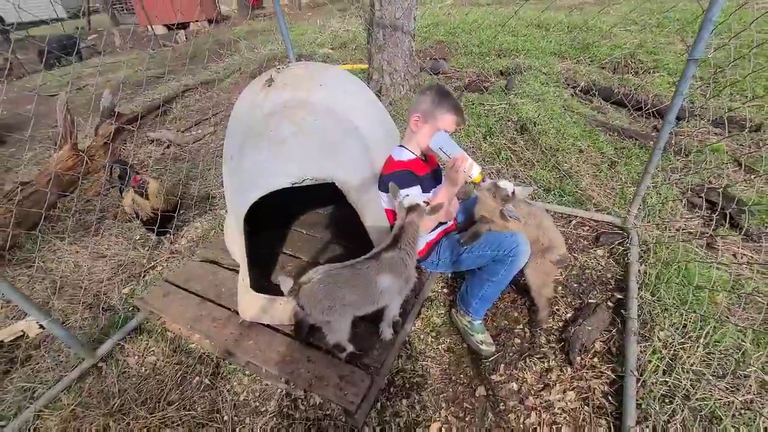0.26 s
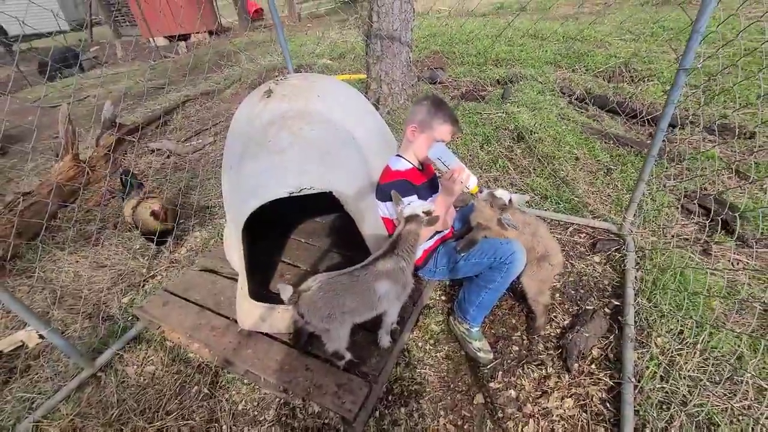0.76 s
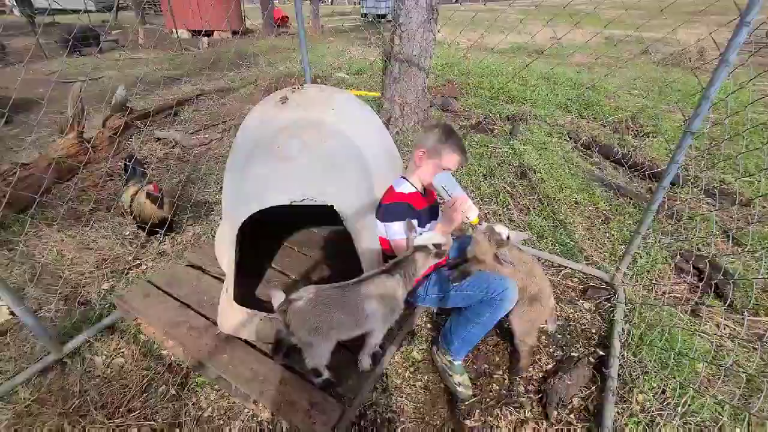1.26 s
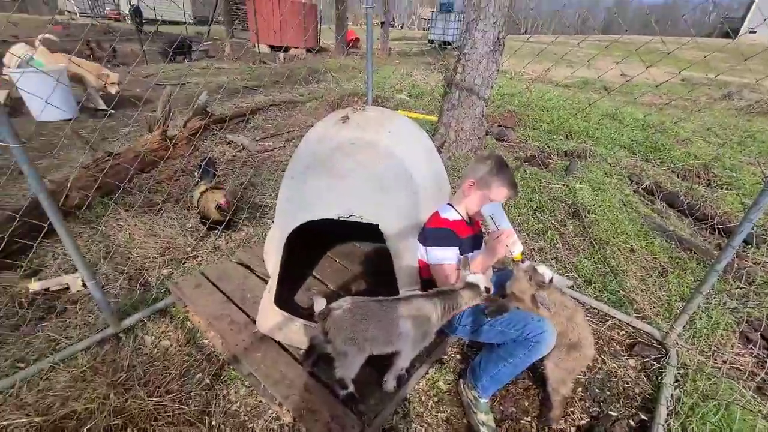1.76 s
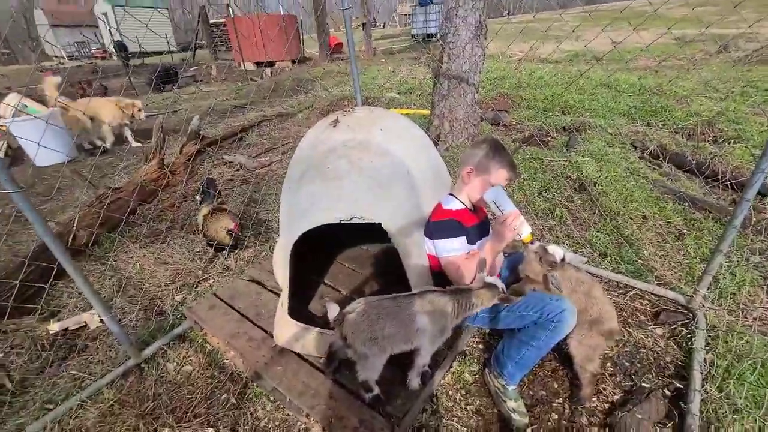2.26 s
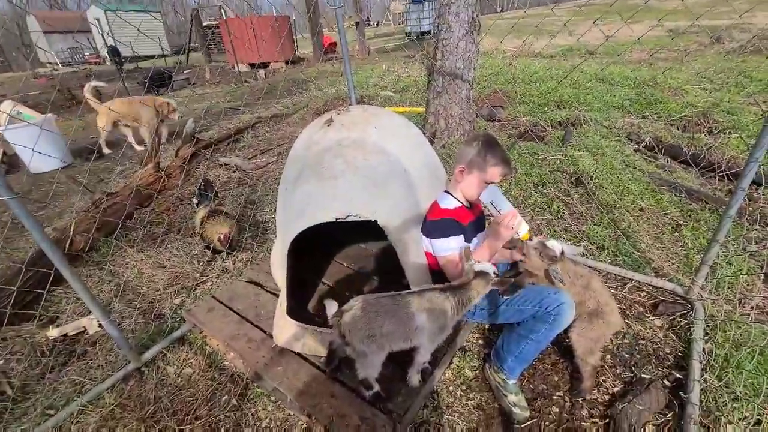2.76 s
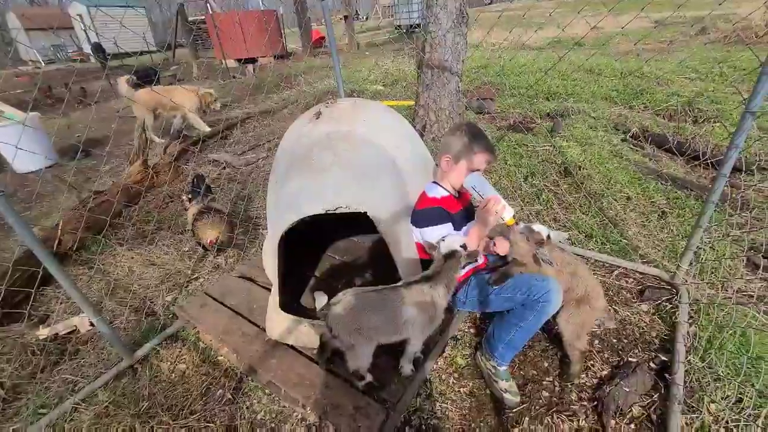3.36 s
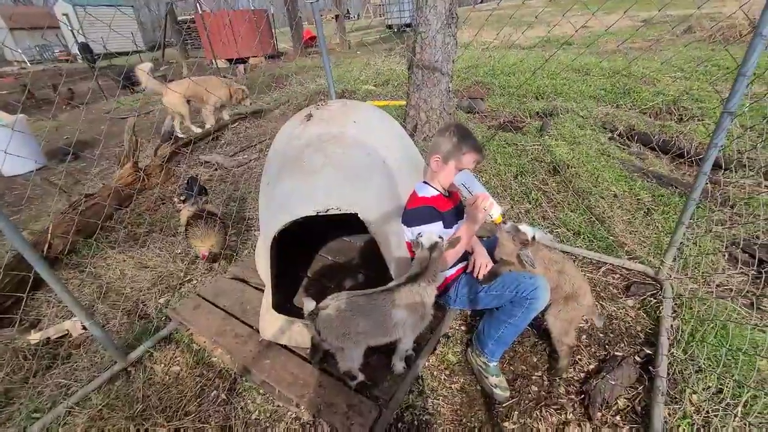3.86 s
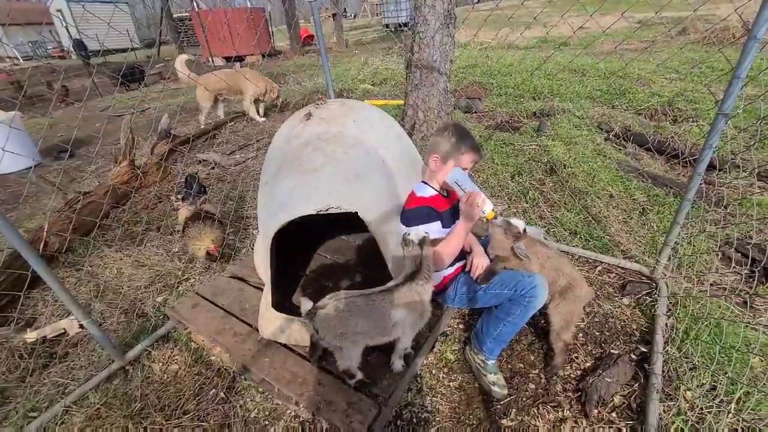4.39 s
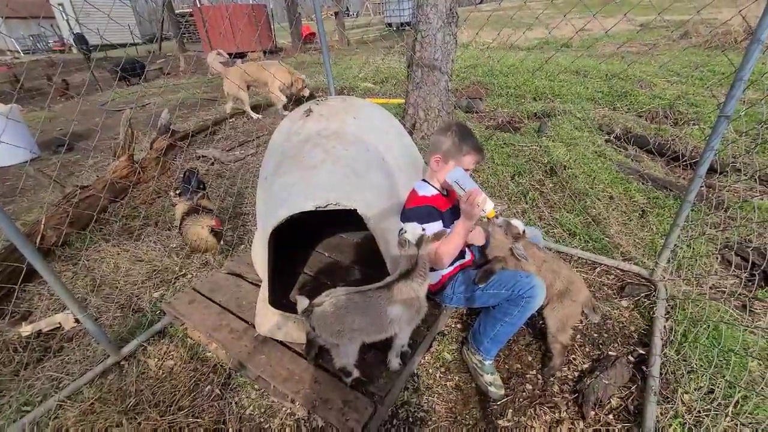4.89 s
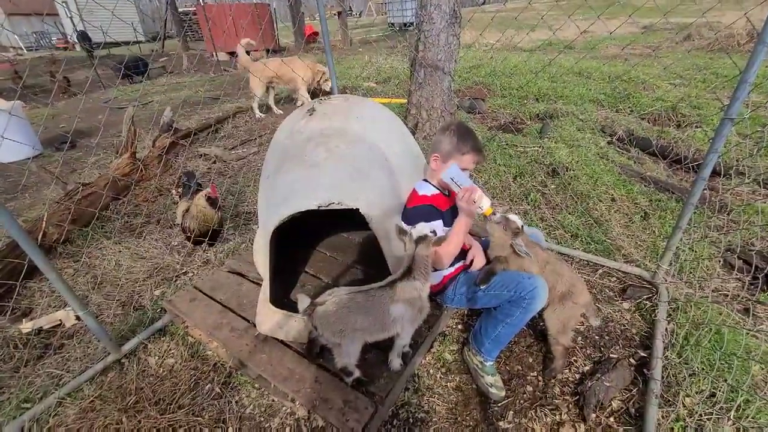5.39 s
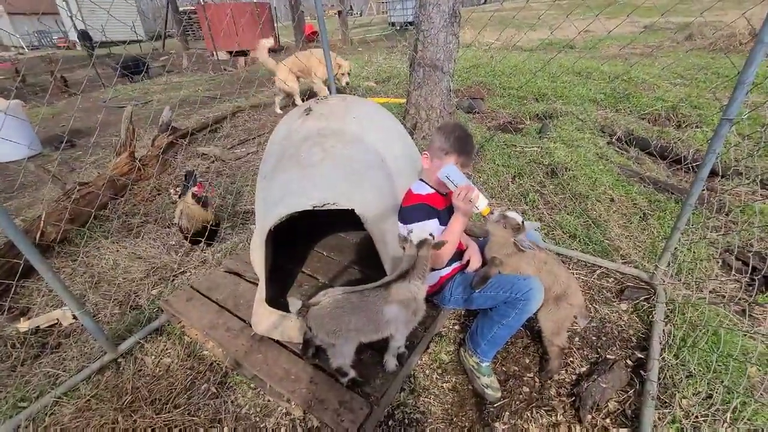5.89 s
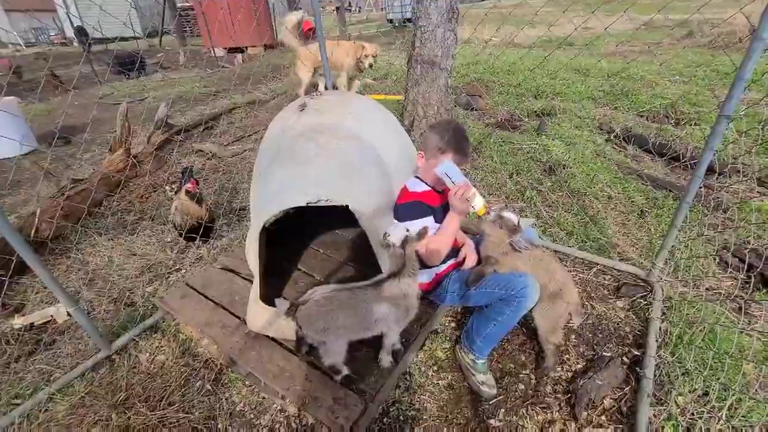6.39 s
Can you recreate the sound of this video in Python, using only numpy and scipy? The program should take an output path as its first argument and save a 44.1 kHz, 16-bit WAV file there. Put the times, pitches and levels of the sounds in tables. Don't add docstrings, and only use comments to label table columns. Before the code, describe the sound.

In an open farm pen, soft wind rumble and straw rustle lie under sharp hollow hoof knocks. A small goat kid bleats in thin breathy puffs, then a second gives a loud, fast-fluttering bleat. A bottle is sucked wetly with small grunts. Later come hard knocks, a rattling latch, ringing posts and a run of wire ticks, then a hen's short clucks. Close, nearly dry sound.

```python
import sys
import numpy as np
from scipy import signal
from scipy.fft import rfft, irfft
from scipy.io import wavfile
from scipy.ndimage import uniform_filter1d

SR = 44100
rng = np.random.default_rng(int(sys.argv[2]) if len(sys.argv) > 2 else 0)


def pcm_store(signal):
    levels = np.round(np.clip(np.atleast_2d(signal), -1, 1) * 32767)
    wavfile.write(sys.argv[1], SR, levels.astype(np.int16).T)


def decibels_to_gain(level_db):
    exponent = np.asarray(level_db, float) / 20
    return 10 ** exponent


N = 292824
T = np.arange(N) / SR

# pitch_hz, density_db
YARD_COLOUR = [(12, -41), (20, -6), (91, 0.5), (189, -11.5), (479, -15), (709, -12), (939, -17.5),
               (1240, -14.5), (2180, -21), (3140, -16), (5360, -28), (6910, -20.5), (8650, -39.5),
               (10500, -38), (12200, -32.5), (13500, -46), (15200, -36), (16500, -108)]
# time_s, rustle_db
STRAW_STIR = [(0.0, -60.5), (0.74, -63.5), (0.87, -60), (1.2, -64.5), (1.9, -57.5), (2.33, -53),
              (2.79, -56), (2.981, -63), (3.25, -55.5), (3.79, -58.5), (4.25, -53.5), (4.57, -56),
              (5.16, -61), (5.31, -55.5), (5.81, -57.5), (6.64, -56)]

# start_s, peak_db,
# tilt_db_per_octave (taut wire adds fade_60db_s)
MESH_TICKS = [(0.373, -42, -10.5), (1.306, -49.5, -1), (2.2173, -40, -8), (2.821, -35.5, -9),
              (2.9322, -39.5, -4), (3.022, -35.5, -7), (3.126, -29, -2.5), (3.302, -46, -4),
              (3.619, -50.5, 1), (3.698, -42, -10), (3.8718, -38.5, -3), (4.0635, -26, -5),
              (4.1105, -32.5, -3), (4.158, -58, 2), (4.416, -37, -1), (4.332, -24, -1.5), (4.426, -25, 0),
              (4.5216, -23, 1.5), (4.622, -29, -0.5), (4.7047, -26.5, 1.5), (4.795, -36, -0.5),
              (5.029, -40.5, 5), (5.129, -46, 8), (5.323, -33.5, -5), (5.1937, -24.5, 3),
              (5.4126, -29, 1.5), (5.6912, -31.5, 0.5), (5.789, -38, -2.5), (5.994, -41.5, -1.5),
              (6.059, -43, 8), (6.125, -32.5, 0), (6.3003, -37.5, -1.5), (6.37, -29.5, 1),
              (6.561, -37, -5.5)]
TAUT_TICKS = [
    (1.438, -33, 4, 0.0053),
    (1.4528, -33, -8, 0.0072),
    (1.818, -26, -8.5, 0.005),
    (3.742, -39.5, 10, 0.023),
    (3.807, -33, -2.5, 0.12),
    (6.031, -34, -4.5, 0.062),
    (6.1826, -30.5, -2, 0.15),
]
# pitch_hz, gain_db
TICK_COLOUR = [(710, -82), (1200, -14.5), (2030, -6), (2420, -5.5), (3180, 1), (4100, 3.5), (4280, 1),
               (6860, 1.5), (8180, -10.5), (9230, -4.5), (14800, -15.5), (16000, -29), (16500, -55)]

# start_s, length_s, level_db, tilt_db_per_octave
WET_SUCKS = [(0.316, 0.011, -48, -1.5), (0.503, 0.023, -51, -2.5), (0.693, 0.012, -52.5, 5),
             (0.867, 0.026, -48, 1.5), (1.242, 0.028, -51.5, -1.5), (1.608, 0.082, -56.5, 4.5),
             (1.75, 0.12, -61, 6), (1.942, 0.07, -57, 5), (2.161, 0.06, -51, -1.5),
             (2.011, 0.02, -43, -4.5), (3.343, 0.022, -52, 2.5), (3.534, 0.019, -50, -2),
             (3.713, 0.022, -46.5, -6.5), (3.897, 0.039, -50.5, -3.5), (4.205, 0.056, -40.5, 6.5),
             (4.798, 0.044, -50, 0.5), (4.292, 0.021, -39, 0.5), (4.483, 0.015, -40, 0.5),
             (4.842, 0.047, -53.5, 1)]
DRY_SUCKS = [(2.351, .008, -62, 12), (2.38, 0.017, -60, 8), (2.53, .02, -58, 10), (5.052, 0.029, -48.5, 0),
             (5.221, 0.054, -44, -3), (5.326, 0.025, -50, -4), (5.441, 0.041, -45.5, 0.5),
             (5.633, 0.027, -45, -1), (5.835, 0.027, -47.5, -5), (6.031, 0.022, -49, 4.5),
             (6.223, 0.034, -46, 1.5), (6.412, 0.022, -48, 0), (6.541, 0.014, -46, -7),
             (6.618, 0.016, -46, 5)]
# pitch_hz, gain_db
SUCK_COLOUR = [(1060, -35.5), (1800, 4.5), (2270, -17.5), (2760, 9.5), (3640, 0.5), (3990, 10.5),
               (5320, -7.5), (6590, 7.5), (8080, -6.5), (13800, -7.5), (15200, -16), (15900, -30),
               (16500, -70)]
# start_s, length_s, level_db, hollow_hz
GRUNTS = [
    (0.685, 0.037, -48, 547),
    (1.916, 0.029, -41, 630),
    (2.303, 0.03, -43, 594),
    (2.671, 0.025, -47, 393),
    (4.933, 0.031, -44.5, 640),
    (5.362, 0.021, -38, 565),
    (5.489, .022, -53, 646),
    (5.551, 0.04, -40.5, 560),
]
# pitch_hz, gain_db
GRUNT_COLOUR = [(150, -4), (250, -14.5), (625, -8.5), (949, -9.5), (1180, -3), (1330, -25), (1460, 0),
                (1620, -11), (2350, 0.5), (4000, -66), (5200, -58), (8800, -120)]

# start_s, peak_db, hollow_hz, fade_60db_s
KNOCKS = [(0.7547, -22.5, 1410, 0.37), (0.7771, -13.5, 1240, 0.13), (0.7784, -12.5, 2130, 0.055),
          (0.984, -37, 690, 0.085), (1.053, -39.5, 1100, 0.32), (2.367, -22, 2450, 0.17),
          (2.393, -19, 1130, 0.076), (2.404, -20, 1190, 0.25), (2.989, -23.5, 1120, 0.17),
          (3.199, -8.5, 2830, 0.092), (3.4082, -20.5, 1250, 0.18), (3.834, -24, 720, 0.03),
          (3.856, -51, 2620, 0.13), (4.063, -25.5, 740, 0.17), (4.1427, -21, 820, 0.18),
          (4.1979, -9, 2730, 0.12), (4.219, -26, 590, 0.53), (4.432, -30, 1210, 0.28),
          (4.798, -33, 3200, 0.74), (5.193, -22, 610, 0.21)]
# pitch_hz, gain_db
KNOCK_COLOUR = [(150, -61), (250, -18.5), (460, -8), (566, -5), (938, -1.5), (1420, 3), (1550, -4),
                (1880, -0.5), (2200, -12), (3120, -5), (4190, -9.5), (9660, -21), (16000, -43)]
# pitch_ratio, level_db, fade_60db_s
POST_MODES = [(1, -2, 0.63), (1.022, -13, 1), (0.978, -15, 0.92), (1.056, -5.5, 0.48), (1.289, -20, 0.48),
              (1.601, -13.5, 0.38)]
# start_s, level_db
THIN_POST_RINGS = [
    (.785, -40.5),
    (2.931, -53.5),
    (3.029, -54),
    (3.126, -47.5),
]
THICK_POST_RINGS = [(3.205, -42.5), (3.411, -54.5), (4.202, -32.5), (4.332, -48), (4.43, -48),
                    (4.522, -47.5), (4.621, -52), (4.705, -46.5), (4.799, -46.5), (5.189, -38),
                    (5.411, -53.5), (5.693, -62), (6.199, -53), (6.37, -48)]
# start_s, peak_db
LATCH_RATTLE = [(0.7495, -33), (3.2015, -16), (3.2036, -19), (3.211, -30), (3.8557, -24), (4.008, -56),
                (4.029, -39), (4.046, -35), (4.085, -34), (4.091, -25), (4.112, -28), (4.1303, -28),
                (4.146, -27), (4.165, -22.5), (4.1817, -25)]
# start_s, peak_db, pitch_hz
THUMPS = [
    (2.999, -38, 55),
    (3.14, -31, 64.5),
    (4.065, -39, 240),
    (4.088, -41.5, 200),
    (4.11, -38, 260),
    (4.143, -35, 180),
    (4.196, -34, 200),
    (5.442, -39.5, 56),
]

# time_s, pitch_hz, level_db
FAR_MOAN = [
    (1.461, 212, -68.5),
    (2.0, 221, -61),
    (2.15, 214, -71),
]
# start_s, length_s, start_hz, top_hz, level_db
LOUD_OPEN = [
    (2.058, 0.035, 278.5, 301.5, -46),
    (2.158, 0.029, 340.8, 380.3, -41.5),
    (2.243, 0.037, 369, 408.4, -35.5),
    (2.33, 0.043, 399, 426.5, -24),
    (2.422, 0.047, 386.7, 424.5, -23.5),
    (2.514, .05, 374.6, 417, -22),
    (2.61, 0.046, 384, 407.6, -22),
    (2.706, 0.035, 365, 365.3, -24.5),
]
THIN_OPEN = [
    (1.552, 0.028, 651, 739, -50.5),
    (1.645, 0.04, 792, 750, -35.5),
    (1.758, 0.041, 756, 743, -40),
    (1.868, 0.052, 750, 743, -46.5),
    (1.985, 0.052, 764, 758, -47),
    (2.103, 0.048, 753, 778, -47),
]
HEN_OPEN = [
    (5.144, .036, 450.6, 443, -30),
]
CLUCK_OPEN = [
    (5.346, .026, 260, 396, -39.5),
]
# open_hz, pinched_hz, half_width_hz, open_db, pinched_db
LOUD_THROAT = [(884, 836, 97, -1.5, -6.5), (1650, 1200, 125, -14, -50), (2305, 2410, 130, 0.5, 3),
               (2850, 3020, 390, -6, -4), (3245, 3340, 280, -1, 7), (3950, 4300, 112, -2.5, 4.5),
               (4560, 4620, 180, -6, 9.5), (6000, 5710, 350, -12.5, 4), (7540, 7170, 320, -34, -15),
               (9570, 8500, 680, -43, -30.5), (12400, 11000, 900, -44, -41)]
THIN_THROAT = [(750, 370, 660, 0, -10), (1570, 1700, 430, -2, -15), (2280, 2900, 540, 1.5, -5),
               (3200, 3000, 440, -2.5, -2), (3850, 4000, 660, -3.5, -11), (6260, 7200, 510, 1, 5),
               (7060, 7800, 410, 6.5, 6), (10200, 12000, 2400, -31, -29)]
HEN_THROAT = [(447, 680, 320, -2.5, -0.5), (900, 690, 284, 1, 1.5), (1800, 1560, 160, 1, -8),
              (2330, 2400, 620, -9, -25), (3200, 2800, 310, -11, -16), (4860, 4800, 380, -5.5, -20),
              (10900, 8400, 1600, -40, -36.5)]
# time_s, resonance_stretch, treble_db, pinched_hz, early_push_db, tongue_swing_share, middle_db
LOUD_JAW = [(2.05, 0.9, -1, 275.4, 4, -0.14, 8), (2.212, 1.04, 1, 319.2, -2, 0.054, 7),
            (2.299, 1.023, 5.5, 429.6, -8.5, 0.13, 14.5), (2.388, 1.096, 4, 383.2, -0.5, 0.23, 6),
            (2.45, 1.017, 1, 338.3, -2.5, 0.26, 4), (2.5, 1.039, 3.5, 314.5, 1.5, 0.23, 6.5),
            (2.59, 1.07, -4, 317.5, -3.5, .08, -1), (2.671, 1.07, -3, 319.3, 4.5, 0.0016, 6.5),
            (2.77, 1.046, -5, 272.5, 2.5, -0.081, 3.5)]
THIN_JAW = [(1.551, 0.96, -5.5, 656, 8.5, .15, 0), (1.662, 0.94, 6.5, 800, -12, 0.14, 0),
            (1.779, 0.92, 4, 759, -3, .15, 0), (1.901, 0.92, -3.5, 752, 1.5, 0.18, 0),
            (2.13, 0.97, -1, 760, -4, 0.17, 0)]
HEN_JAW = [(5.14, 0.987, 0, 442, -2, 0.16, 0), (5.197, 0.965, 0, 362.8, 0, .15, 0)]
CLUCK_JAW = [(5.34, 0.96, -3, 250, -2, .15, 0.0048), (5.39, 0.98, -5, 333.4, -2, .15, 0)]
# end_over_top_pitch, dip_db, lead_in_s, last_pinch_s, air_burst_share, top_share_of_opening
LOUD_PINCH = (.92, -11, .028, .052, 1, .68)
THIN_PINCH = (1.045, -36, .012, .03, .2, .5)
HEN_PINCH = (.92, -7, .005, .026, .2, .68)
CLUCK_PINCH = (.9, -14, .005, .01, .2, .75)
# time_s, lift_db
LOUD_UPPER = [(2.05, -4), (2.27, 10), (2.35, -3), (2.45, -2), (2.55, 3.5), (2.64, 7), (2.72, 5)]


def colour(hz, points):
    f, db = np.transpose(points)
    return decibels_to_gain(np.interp(np.log(np.maximum(hz, 1)), np.log(f), db))


def unit(x):
    return x / np.sqrt(np.mean(x ** 2) + 1e-18)


def noise(size):
    return rng.standard_normal(size)


def shaped(x, points, hz=1000, width=1., lift_db=0, tilt_db=0, ripple_db=0):
    f = np.arange(len(x) // 2 + 1) * SR / len(x) + 1
    hump = 1 + (decibels_to_gain(lift_db) - 1) / (1 + ((f - hz) / (width * hz)) ** 2)
    ripple = unit(uniform_filter1d(noise(len(f)), size=len(f) // 80))
    gain = colour(f, points) * hump * decibels_to_gain(ripple_db * ripple) * decibels_to_gain(tilt_db * np.log2(f / 5000))
    cepstrum = irfft(np.log(gain), len(x))
    cepstrum[1:len(x) // 2] *= 2
    cepstrum[len(x) // 2 + 1:] = 0
    return unit(irfft(rfft(x) * np.exp(rfft(cepstrum)), len(x)))


def walk(rate_hz, size=N):
    k = int(SR / rate_hz)
    steps = np.repeat(noise(size // k + 1), k)
    return unit(uniform_filter1d(uniform_filter1d(steps, k), k)[:size])


def add(out, start_s, x):
    i = int(start_s * SR)
    out[i:i + len(x)] += x[:N - i]


def ring(t, hz, t60):
    return np.sin(2 * np.pi * hz * t) * decibels_to_gain(-60 * t / t60)


def band(order, hz, kind, x):
    return signal.sosfilt(signal.butter(order, hz, kind, fs=SR, output="sos"), x)


def yard():
    s, rustle_db = np.transpose(STRAW_STIR)
    wind_db = -54 + 0.5 * s + 0.19 * (rustle_db - rustle_db.mean())
    air = shaped(noise(N), YARD_COLOUR)
    low = signal.sosfiltfilt(signal.butter(2, 200, fs=SR, output="sos"), air)
    hum_hz = 110 + 2.96 * walk(5.4)
    hum = decibels_to_gain(-9.0 + 0.65 * walk(2.08)) * np.sin(2 * np.pi * np.cumsum(hum_hz) / SR)
    wind = (unit(low) * decibels_to_gain(walk(10.0)) + hum) * decibels_to_gain(np.interp(T, s, wind_db))
    rustle = unit(air - low) * decibels_to_gain(np.interp(T, s, rustle_db) + 1.3 * walk(30))
    return wind + rustle


def far_moan():
    s, hz, db = np.transpose(FAR_MOAN)
    swell = np.interp(T, [s[0] - .05, s[0], s[-1], s[-1] + 0.068], [0, 1, 1, 0])
    level = decibels_to_gain(np.interp(T, s, db) - 2.5 + 4.5 * walk(22))
    pitch_hz = np.interp(T, s, hz) + 4 * walk(25)
    return swell * level * np.sqrt(2) * np.sin(2 * np.pi * np.cumsum(pitch_hz) / SR)


def wire_ticks():
    mesh_hz, mesh_t60_s, taut_hz, wire_hz = 3530, 0.081, 6850, 9000
    out, t = np.zeros(N), T[:SR // 4]
    events = [(*tick, mesh_hz, mesh_t60_s) for tick in MESH_TICKS]
    events += [(s, db, tilt_db, taut_hz, t60) for s, db, tilt_db, t60 in TAUT_TICKS]
    for s, db, tilt_db, hz, t60 in events:
        hz = hz * (1 + 0.03 * rng.standard_normal())
        hiss = shaped(noise(len(t)), TICK_COLOUR, hz, 0.071, 4.5, tilt_db, 3.5)
        click, shiver = decibels_to_gain(-60 * t / 0.014), decibels_to_gain(-5.5 - 60 * t / (2 * t60))
        add(out, s, 0.38 * decibels_to_gain(db) * hiss * np.minimum(t / 0.00092, 1) * (click + shiver))
        add(out, s, decibels_to_gain(db - 33) * ring(t, wire_hz, 2.3 * t60) * walk(1500, size=len(t)))
    return out


def sucks():
    wet_hz, wet_lift_db, dry_hz, dry_lift_db = 4800, 12, 7220, 5.0
    out, t = np.zeros(N), T[:4096]
    events = [(*suck, wet_hz, wet_lift_db) for suck in WET_SUCKS]
    events += [(*suck, dry_hz, dry_lift_db) for suck in DRY_SUCKS]
    for s, length, db, tilt_db, hz, lift_db in events:
        hz = hz * (1 + 0.054 * rng.standard_normal())
        bubbles_db = 3.3 * noise(len(t) // 32).repeat(32)
        fizz = noise(len(t)) * decibels_to_gain(bubbles_db)
        swell = np.interp(t, [0, 0.37 * length, length, length + 0.0054], [0.2, 0.93, 1.0, 0.017])
        add(out, s, decibels_to_gain(db) * swell * shaped(fizz, SUCK_COLOUR, hz, .07, lift_db, tilt_db, ripple_db=4.0))
    return out


def grunts():
    out, t = np.zeros(N), T[:4096]
    for s, length, db, hz in GRUNTS:
        rate_hz = 202.9 - 1.5 * (db + 38.5)
        uneven = unit(uniform_filter1d(noise(len(t)), size=200))
        phase = np.cumsum(rate_hz * (1 + 0.044 * uneven)) / SR
        pulses = np.diff(np.floor(phase), prepend=0) + 0.056 * noise(len(t))
        swell = np.sin(np.pi * np.clip(t / length, 0, 1)) ** 0.74
        add(out, s, decibels_to_gain(db) * swell * shaped(pulses, GRUNT_COLOUR, hz, 0.28, 26.0))
    return out


def board_thumps():
    out, t = np.zeros(N), T[:SR // 2]
    for s, db, hz in THUMPS:
        add(out, s, decibels_to_gain(db) * ring(t, hz, 8 / hz))
    return out


def latch_rattle():
    latch_hz, body_hz = 2690, 1450
    out, t = np.zeros(N), T[:SR // 2]
    for s, db in LATCH_RATTLE:
        hz = latch_hz * (1 + 0.011 * rng.standard_normal())
        rings = 0.95 * ring(t, hz, 0.015) + 0.17 * ring(t, body_hz, 0.015)
        scrape = shaped(noise(len(t)), KNOCK_COLOUR, hz, 0.11, 22.0) * decibels_to_gain(-60 * t / 0.03)
        add(out, s, decibels_to_gain(db) * (rings * np.minimum(t / 0.00086, 1) + 0.28 * scrape))
    return out


def post_rings():
    thin_hz, thick_hz = 3240, 3090
    out, t = np.zeros(N), T[:SR // 2]
    events = [(*r, thin_hz) for r in THIN_POST_RINGS] + [(*r, thick_hz) for r in THICK_POST_RINGS]
    for s, db, hz in events:
        post = np.zeros(len(t))
        for shift, (ratio, mode_db, t60) in zip(rng.random(len(POST_MODES)), POST_MODES):
            post += decibels_to_gain(mode_db) * ring(t + shift / hz, ratio * hz, t60)
        flutter = 1 + .45 * walk(220, size=len(t))
        add(out, s, post * (1 - np.exp(-t / .01)) * decibels_to_gain(db) * flutter)
    return out


def hoof_knocks():
    rise_s, contact_s = 0.0053, .00004
    out, t = np.zeros(N), T[:SR // 2]
    swell = np.minimum(t / rise_s, 1) ** 0.81
    contact = np.exp(-((t - rise_s) / contact_s) ** 2)
    for s, db, hz, t60 in KNOCKS:
        tilt_db = 0.12 * (db + 14.5)
        scrape = shaped(noise(len(t)), KNOCK_COLOUR, hz, 0.41, 17.4, tilt_db)
        scrape = scrape * decibels_to_gain(-60 * t / (0.42 * t60))
        tail = shaped(noise(len(t)), KNOCK_COLOUR, tilt_db=tilt_db, ripple_db=3)
        tail = tail * decibels_to_gain(-10.5 - 60 * t / (2.0 * t60))
        blow = shaped(contact, KNOCK_COLOUR, hz, 0.072, 24.6, tilt_db - 4.0)
        blow = decibels_to_gain(0.34 * (db - 3.5)) * blow / abs(blow).max()
        add(out, s - 0.37 * rise_s, decibels_to_gain(db) * (0.31 * (scrape + tail) * swell + blow))
    return out


def throat_motion(opens, pinch, jaw, edge_db, fade_s):
    sag, dip_db, lead_s, last_s, _, top = pinch
    jaw_s, _, _, pinched_hz, push, _, _ = np.transpose(jaw)
    starts, lengths, _, _, levels = np.transpose(opens)
    ends = starts + lengths
    between_s = (ends[:-1] + starts[1:]) / 2
    between_db = 1.22 * (levels[:-1] + levels[1:]) / 2 + 5.5 + dip_db
    shuts = [(starts[0] - lead_s, levels[0] - 24),
             (ends[-1] + last_s / 2, levels[-1] + dip_db),
             (ends[-1] + last_s, levels[-1] + 1.1 * dip_db),
             (ends[-1] + last_s + fade_s, -70)]
    shuts += zip(between_s, between_db)
    shuts += zip(starts[1:] - .007, between_db + 2)
    knots = [(s, np.interp(s, jaw_s, pinched_hz), db, 0, .5) for s, db in shuts]
    for a, length, start_hz, top_hz, db in opens:
        b = a + length
        end_hz = top_hz * (1 + (sag - 1) * np.clip((db + 50) / 12, .2, 1))
        push_db = np.interp(a + .4 * length, jaw_s, push)
        early_hz = start_hz + 0.154 * (top_hz - start_hz)
        knots += [(a, start_hz, db + edge_db + .5 * min(push_db, 0), .6, 1),
                  (a + .3 * length, early_hz, db + push_db, .75, .9),
                  (a + top * (b - a), top_hz, db, 1, .3),
                  (b, end_hz, db + 0.36 * edge_db, .85, .6),
                  (b + .008, end_hz, db + 1.5 * edge_db, .3, .8)]
    return np.transpose(sorted(knots))


def voice(opens, pinch, throat, jaw, jitter, breath_db, edge_db, fade_s, upper=((0, 0),)):
    middle = 4
    s, *columns = throat_motion(opens, pinch, jaw, edge_db, fade_s)
    span = slice(int(s[0] * SR), int(s[-1] * SR))
    t = T[span]
    hz, db, opening, tongue = (uniform_filter1d(np.interp(t, s, c), size=200) for c in columns)
    jaw_s, *jaw_columns = np.transpose(jaw)
    stretch, treble_db, _, _, swing, middle_db = (np.interp(t, jaw_s, c) for c in jaw_columns)
    upper_db = np.interp(t, *np.transpose(upper))
    hz = hz * (1 + jitter * (2 - opening) * walk(200)[span])
    k = np.arange(1, int(16000 / np.median(hz)))[:, None]
    overtone_hz = k * hz
    snap = pinch[4] * np.clip(-np.gradient(opening) * SR / 40, 0, 1)

    gain = 0
    for j, (open_hz, pinched_hz, width_hz, open_db, pinched_db) in enumerate(throat):
        centre = stretch * (pinched_hz + opening * (open_hz - pinched_hz))
        size_db = pinched_db + opening * (open_db - pinched_db)
        size_db = size_db + treble_db * (open_hz > 4300) + 10.0 * snap * (open_hz > 7000)
        if j == middle:
            centre = centre * (1 + swing * tongue)
            size_db = size_db + opening * middle_db
        if j == middle + 1:
            size_db = size_db + opening * upper_db
        resonance = decibels_to_gain(size_db) / (1 + 1j * (overtone_hz - centre) / width_hz) ** 2
        gain = gain + (-1) ** j * resonance
    gain = gain * (overtone_hz < 16200)
    gain = gain / np.sqrt(np.sum(abs(gain) ** 2, axis=0))

    air = 8 * band(2, 280, "lowpass", noise((2, len(k), len(hz))))
    breath = decibels_to_gain(breath_db + 8 * snap + 7 * (1 - opening)) * np.minimum(overtone_hz / 2500, 1)
    breath = breath * np.clip(overtone_hz / 6000, 1, 2) ** 2
    smear = 1 + breath * (air[0] + 1j * air[1])
    phase = 2 * np.pi * k * np.cumsum(hz) / SR + .7 * noise(k.shape)
    tone = np.sum(gain * smear * np.exp(1j * phase), axis=0).real
    hiss = band(4, [7000, 15800], "bandpass", noise(len(hz)))
    out = np.zeros(N)
    out[span] = decibels_to_gain(db) * np.sqrt(2) * tone + decibels_to_gain(db - 33.0 + 1.9 * treble_db) * snap * hiss
    return out


def hen():
    steady = voice(HEN_OPEN, HEN_PINCH, HEN_THROAT, HEN_JAW,
                   jitter=.008, breath_db=-6, edge_db=-4, fade_s=.04)
    rising = voice(CLUCK_OPEN, CLUCK_PINCH, HEN_THROAT, CLUCK_JAW,
                   jitter=.006, breath_db=-9, edge_db=-4, fade_s=.01)
    return steady + rising


def thin_kid():
    return voice(THIN_OPEN, THIN_PINCH, THIN_THROAT, THIN_JAW,
                 jitter=.004, breath_db=-16, edge_db=-11, fade_s=.03)


def loud_kid():
    return voice(LOUD_OPEN, LOUD_PINCH, LOUD_THROAT, LOUD_JAW,
                 jitter=.002, breath_db=-27, edge_db=-5, fade_s=.04, upper=LOUD_UPPER)


def scene():
    near = far_moan() + wire_ticks() + sucks() + grunts()
    near += board_thumps() + latch_rattle() + post_rings() + hoof_knocks()
    near += hen() + thin_kid() + loud_kid()
    t = T[:SR // 4]
    echo = noise(len(t)) * decibels_to_gain(-60 * t / 0.25) * np.minimum(t / 0.0004, 1)
    return (near + decibels_to_gain(-42.5) * signal.fftconvolve(near, echo)[:N] + yard())[None]


def low_pass(x):
    return signal.sosfilt(signal.butter(12, 16670, fs=SR, output="sos"), x)


def record(dry):
    return low_pass(dry)


dry = scene()
out = record(dry)
pcm_store(out)
```